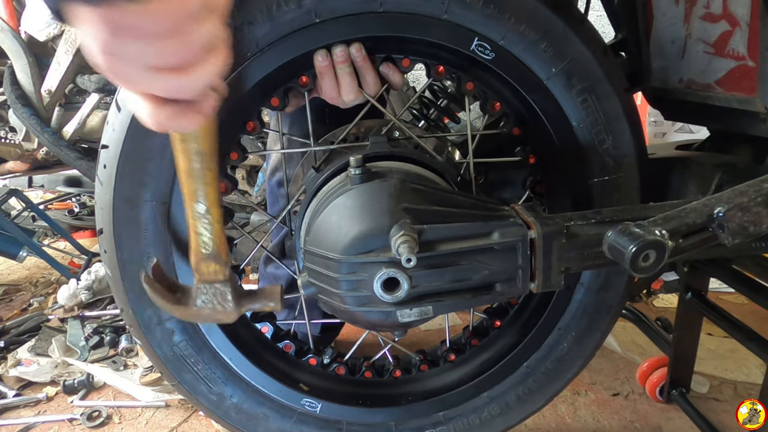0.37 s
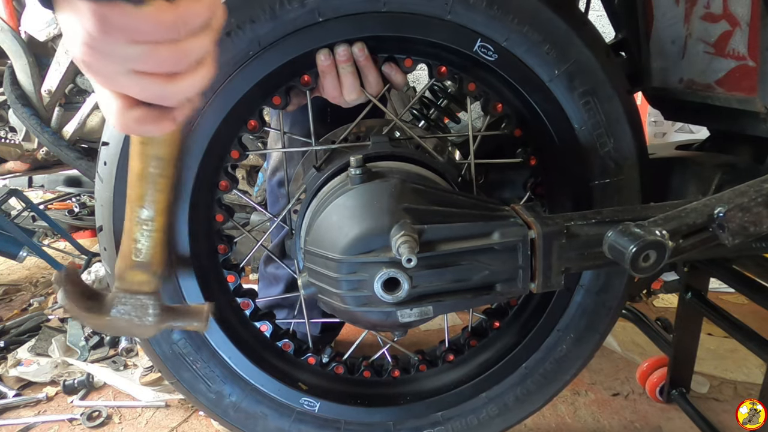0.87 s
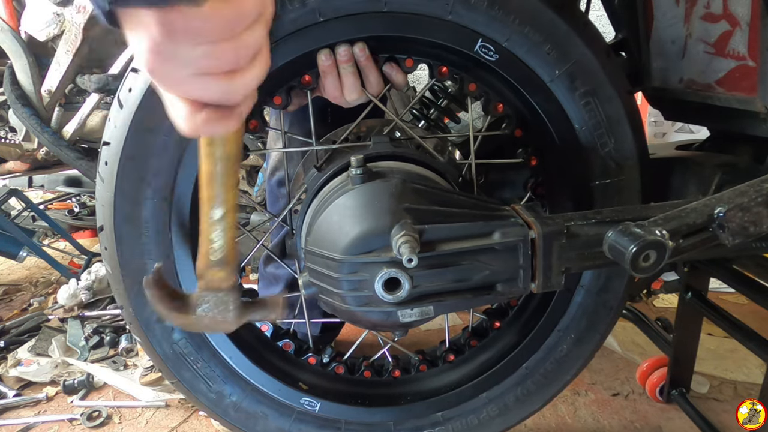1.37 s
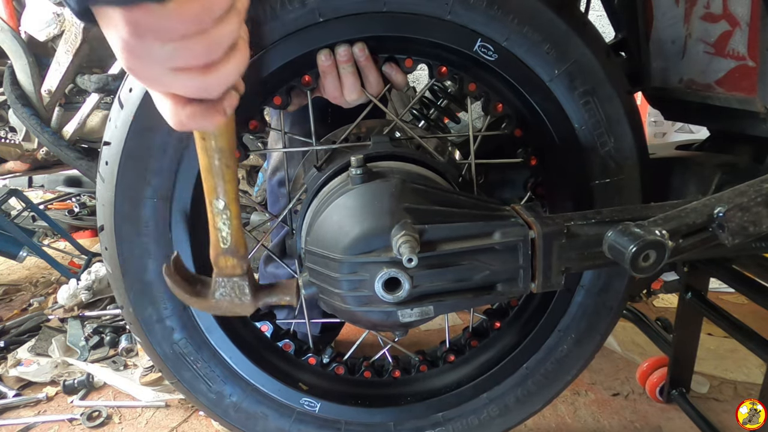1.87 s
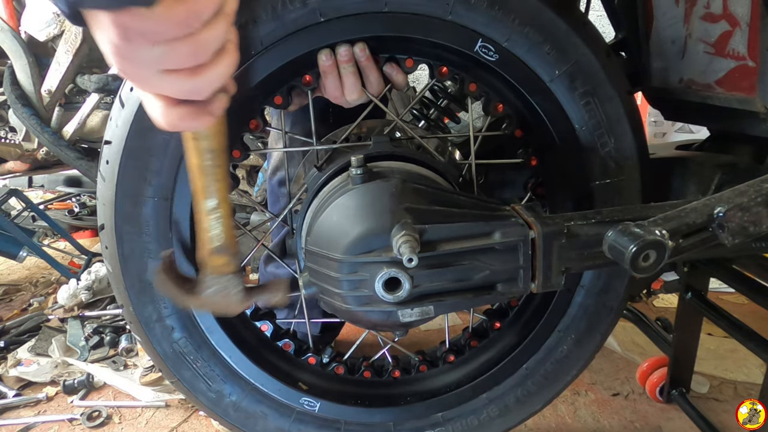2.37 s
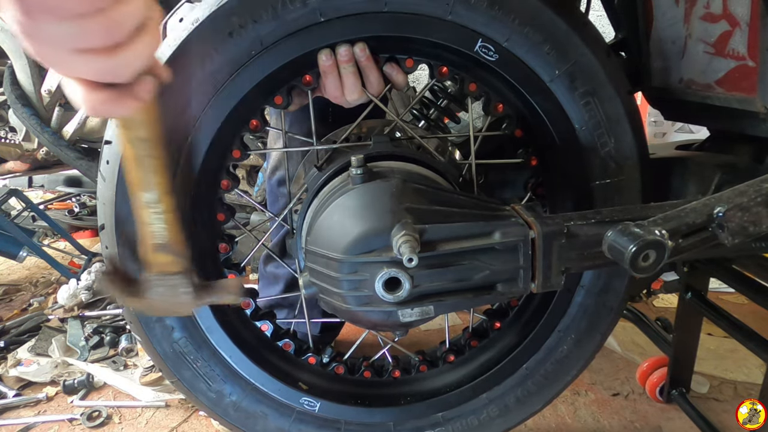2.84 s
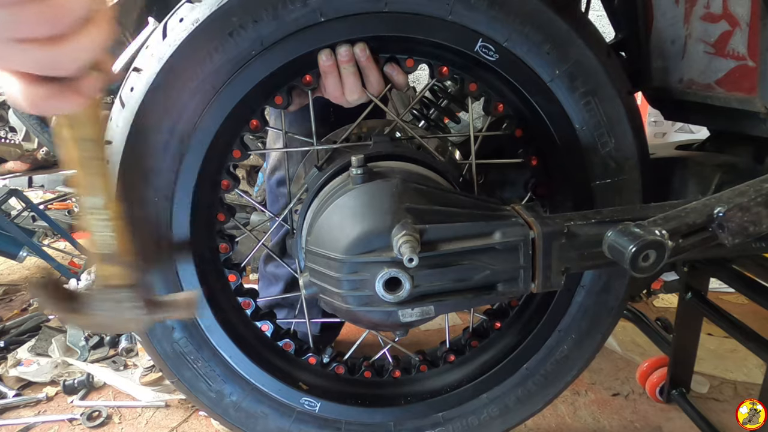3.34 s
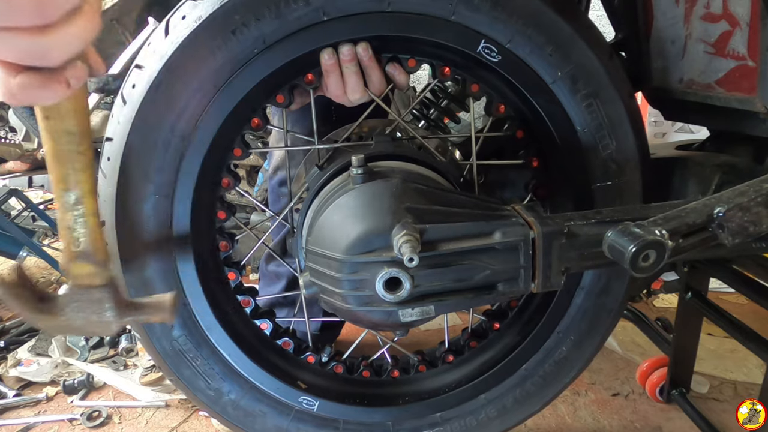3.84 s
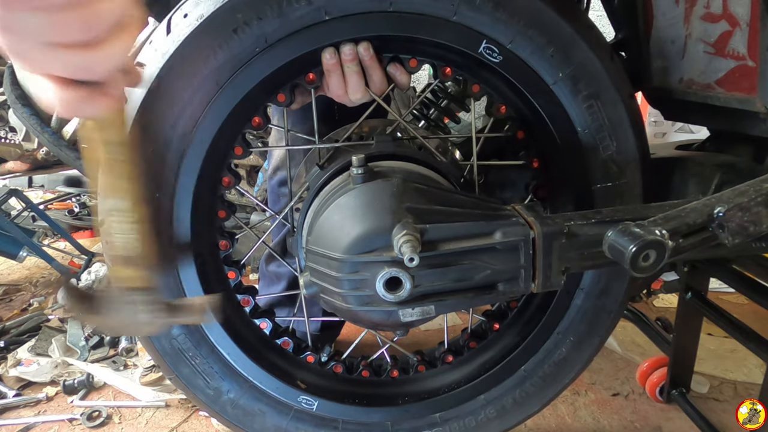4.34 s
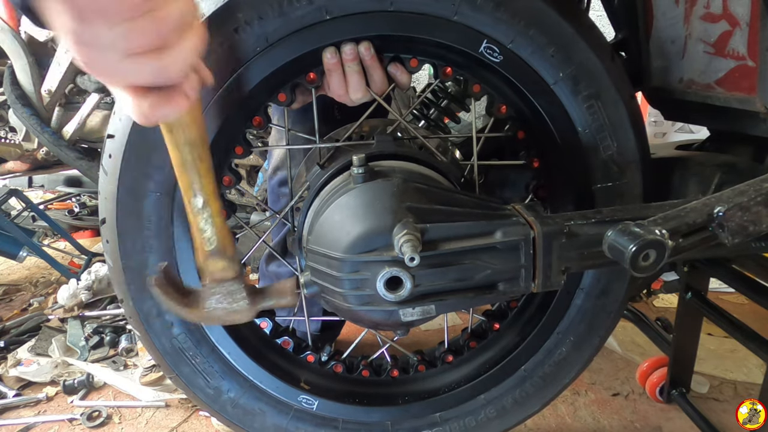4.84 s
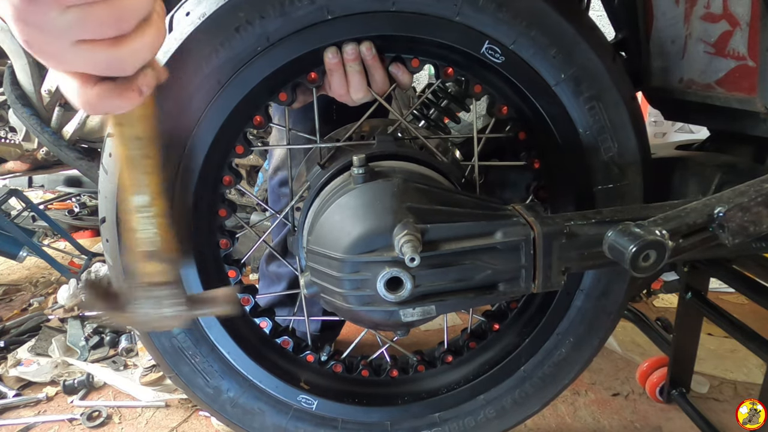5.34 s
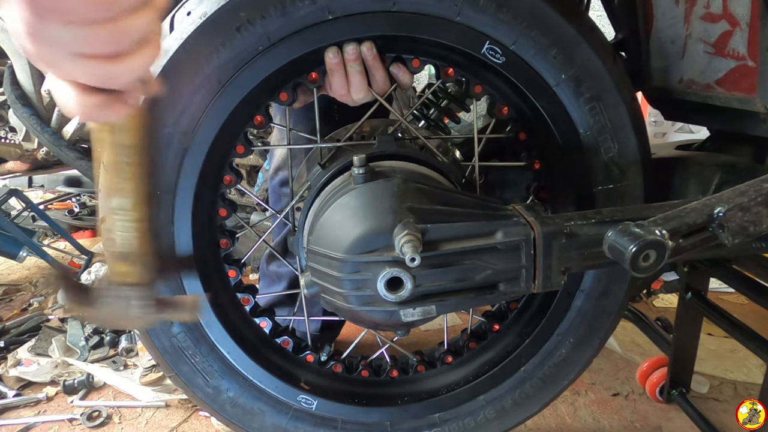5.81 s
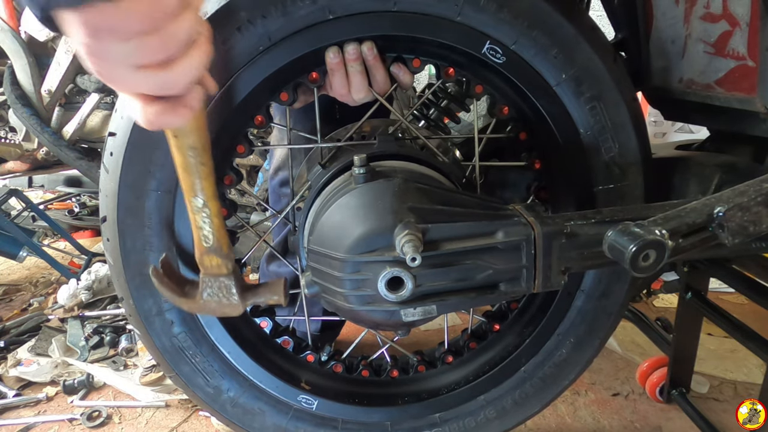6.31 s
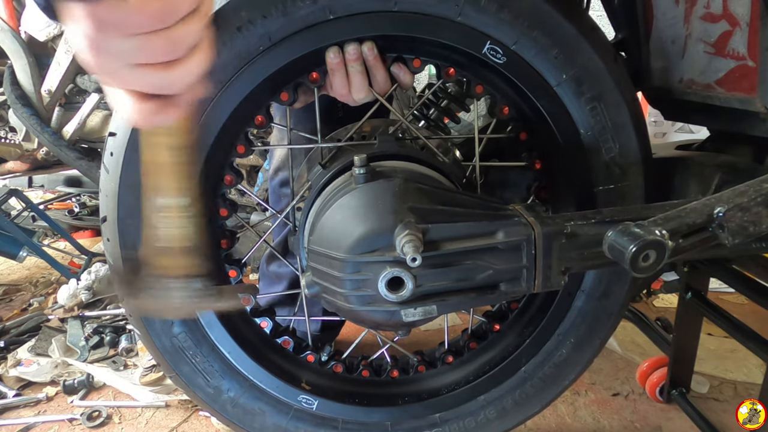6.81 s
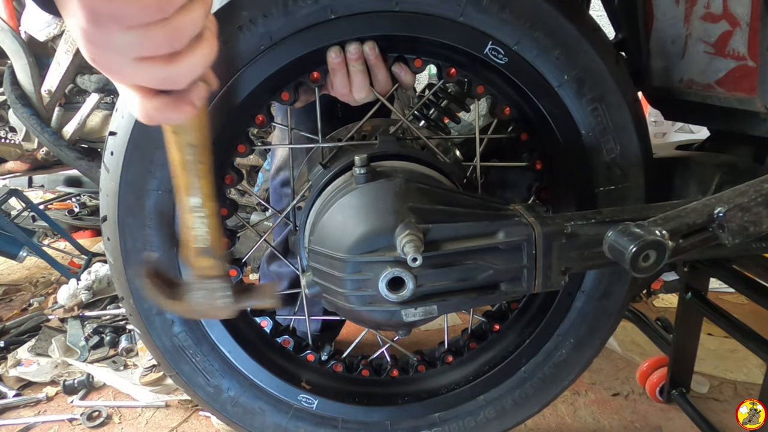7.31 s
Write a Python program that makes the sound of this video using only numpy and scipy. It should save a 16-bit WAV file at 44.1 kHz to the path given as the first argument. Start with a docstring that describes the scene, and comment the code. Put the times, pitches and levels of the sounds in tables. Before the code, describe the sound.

Twenty-one firm hammer blows at a fairly steady pace, slower at first, then slightly quicker. A very brief thin, metallic swell leads into every sharp crack of steel on wood; wheel and hammer ring high for a fraction of a second, the tyre and block thud below. Occasional rebound clacks follow. Small hard-surfaced workshop, close microphone pushed near overload, quiet low background rumble.

```python
"""A quiet workshop rumbles, and a short swell of thin tones rises before every blow of a claw hammer on a
wooden block held against a spoked metal wheel, two to three blows a second. Each is a hard crack with near
echoes, a low jolt and thud, ringing steel and a noise tail for the room; at times the block rebounds and
knocks again. Struck parts are decaying resonances, the rumble is banded noise; loud peaks are squashed."""
import sys
import numpy as np
from scipy import signal
from scipy.fft import rfft, irfft
from scipy.io import wavfile

SR = 44100
rng = np.random.default_rng(int(sys.argv[2]) if len(sys.argv) > 2 else 0)


def generate_wav(sig):
    """Save sig (samples, or channels by samples) to the path in sys.argv[1] as 16-bit PCM at SR."""
    pcm = np.round(np.clip(np.atleast_2d(sig).T, -1, 1) * 32767).astype(np.int16)
    wavfile.write(sys.argv[1], SR, pcm)


def rack_gain(trim_db):
    """Turn a fader trim in dB into the linear factor to multiply a signal by."""
    fader = np.asarray(trim_db, float)
    return 10 ** (fader / 20)


N = 338688


def rms_one(x):
    """Scale to rms 1."""
    return x / np.sqrt(np.mean(x ** 2) + 1e-20)


def at_hz(points, hz):
    """Read a spectrum on a log-frequency axis."""
    point_hz, point_db = np.transpose(points)
    return np.interp(np.log(hz), np.log(point_hz), point_db)


def clicks(seconds, sizes):
    """Single-sample impulses."""
    out = np.full(N, 1e-18)
    index = np.round(np.asarray(seconds) * SR).astype(int)
    np.add.at(out, np.minimum(index, N - 1), sizes)
    return out


def mode(x, hz, t60_s):
    """Two-pole resonance: a unit click sets a decaying sine of height 1 ringing."""
    r, w = rack_gain(-60 / (t60_s * SR)), 2 * np.pi * hz / SR
    return signal.lfilter([0, np.sin(w)], [1, -2 * r * np.cos(w), r * r], x)


def band(x, low_hz, high_hz):
    """Band-pass along the last axis."""
    return signal.sosfilt(signal.butter(2, [low_hz, high_hz], "band", fs=SR, output="sos"), x)


def place(pieces, seconds):
    """Mix one piece per event in at its time."""
    out = np.zeros(N + pieces.shape[1])
    for piece, s in zip(pieces, seconds):
        i = max(round(s * SR), 0)
        out[i:i + len(piece)] += piece
    return out[:N]


# Third-octave band edges in Hz, shared with the room tail.
BAND_EDGES_HZ = 30 * 2 ** np.arange(0, 9.4, 1 / 3)
# Workshop background spectrum. Each row: frequency in Hz, relative level in dB.
RUMBLE_SPECTRUM = [(15, -32), (25, 7), (65, 10.5), (492, -9.5), (661, -6), (2690, -22), (3360, -21),
                   (4630, -34), (4980, -12), (5640, -42), (9000, -58), (11700, -71.5), (19800, -120)]
# Drift of the deepest rumble. Each row: time in seconds, relative level in dB.
DEEP_DRIFT = [(0, 4.5), (0.799, -2.5), (1.502, -3.5), (2.198, 1), (2.799, 2.5), (3.399, 2.5), (4.2, -2.5),
              (5.201, 0.5), (6, -2.5), (6.801, -3), (7.68, 1.5)]
RUMBLE_RMS_DB = -51


def rumble(wander_db=0.5):
    """Workshop background: noise bands, each wandering a little in level."""
    white = rng.standard_normal((2, N + SR))
    samples = np.arange(N + SR)
    steps = np.arange(0, N + SR, SR // 8)
    drift_db = np.interp(samples / SR - 1, *np.transpose(DEEP_DRIFT))  # first second is run-in
    out = 0
    for k, (low_hz, high_hz) in enumerate(zip(BAND_EDGES_HZ[:-2], BAND_EDGES_HZ[1:])):
        wander = np.interp(samples, steps, rng.standard_normal(len(steps)))
        level_db = at_hz(RUMBLE_SPECTRUM, np.sqrt(low_hz * high_hz)) + wander_db * wander
        if low_hz < 130:
            level_db = level_db + drift_db
        out = out + rack_gain(level_db) * band(white[k % 2], low_hz, high_hz)
    return rack_gain(RUMBLE_RMS_DB) * rms_one(out[SR:])


# Spectrum of the swell. Each row: frequency in Hz, relative level in dB.
SWELL_SPECTRUM = [(300, -22.5), (900, -17.5), (1250, -7), (1600, -18.5), (2100, -8), (3100, -1.5),
                  (3800, 1.5), (4600, -13), (5100, 0), (5700, -19), (6550, -4), (7400, -15.5), (10000, -25),
                  (15500, -54.5)]
SWELL_S, SWELL_DEPTH_DB, SWELL_CURVE = .053, 77.5, 1.487


def swell(blow_s, swell_db, count=150):
    """Thin tones of chance pitch and strength rise to each blow and fall away fast after it."""
    t = np.arange(round(1.5 * SWELL_S * SR)) / SR
    slot, turn = rng.random((2, len(blow_s), count))
    hz = 300 + (np.arange(count) + slot) * 15000 / count  # one tone per slot
    level = rack_gain(at_hz(SWELL_SPECTRUM, hz) + rng.uniform(-20, 4, hz.shape))
    tones = []
    for a, f, p in zip(level, hz, turn):
        tones.append(a @ np.sin(2 * np.pi * (f[:, None] * t + p[:, None])))
    tones = np.array(tones)
    tones /= tones.std(axis=1, keepdims=True)
    rise = rack_gain(-SWELL_DEPTH_DB * np.maximum(1 - t / SWELL_S, 0) ** SWELL_CURVE)
    fall = rack_gain(-60 * np.maximum(t - SWELL_S, 0) / .03)
    return place(rack_gain(swell_db)[:, None] * tones * rise * fall, blow_s - SWELL_S)


# Resonances of steel on wood. Each row: frequency in Hz, relative level in dB, T60 in seconds.
CRACK_MODES = [(1200, -37, 0.035), (2270, -27, 0.00083), (2970, -23, 0.0013), (3327, -0.5, 0.0057),
               (3470, -15.5, 0.0012), (4760, -3, 0.001), (4860, -26, 0.0025), (6090, -12, 0.0071),
               (6330, -23.5, 0.055), (8243, -17, 0.026), (11130, -19, 0.004), (13300, -34.5, .003)]
# Near surfaces. Each row: delay in ms, level in dB relative to the direct crack.
NEAR_ECHOES = [(1.5, -11.5), (3.2, -13), (4.1, -16.5), (4.9, -17), (8.1, -30)]


def crack(seconds, level_db, hardness_hz):
    """A push excites the same short resonances at every hit; a soft contact pushes longer and duller."""
    t = np.arange(200) / SR
    w = 2 * np.pi * hardness_hz[:, None]
    push = w * (w * t) ** 3 / 6 * np.exp(-w * t) / SR
    hits = place(rack_gain(level_db)[:, None] * push, seconds) + 1e-18
    direct = -sum(mode(hits, hz, t60_s) * rack_gain(db) for hz, db, t60_s in CRACK_MODES)
    direct = band(direct, 1000, 13000)  # a small block radiates little bass
    out = direct.copy()
    for ms, db in NEAR_ECHOES:
        lag = round(ms * SR / 1000)
        out[lag:] += rack_gain(db) * direct[:-lag]
    return out


def jolt(blow_s, jolt_db):
    """The blow travels through floor and stand: one low damped mode."""
    return mode(clicks(blow_s, -rack_gain(jolt_db)), hz=55, t60_s=.07)


# Block and tyre modes. Each row: frequency in Hz, level in dB relative to the thud, T60 in seconds.
THUD_MODES = [(120, -5.5, 0.19), (183, -11, 0.19), (208, 1.5, 0.14), (242.6, -8, .13), (285.8, -6.5, .22),
              (435, -15, .18), (545.5, -14.5, 0.32), (710, -12.5, 0.087), (1080, -10, 0.09)]
THUD_SPREAD_DB, THUD_LOW_HZ = 3.5, 129
TYRE_HZ, TYRE_SPLIT_HZ, TYRE_DB, TYRE_T60_S = 347.1, 3.6, -9.5, 0.32


def thud(seconds, thud_db):
    """One click per hit rings the modes of block and tyre; a close tyre pair swells after the hit."""
    hits = clicks(seconds, rack_gain(thud_db + TYRE_DB))
    # the pair starts in opposition
    tyre = mode(hits, TYRE_HZ, TYRE_T60_S) - mode(hits, TYRE_HZ - TYRE_SPLIT_HZ, TYRE_T60_S)
    uneven_db = THUD_SPREAD_DB * rng.standard_normal((len(seconds), len(THUD_MODES)))
    body = 0
    for k, (hz, db, t60_s) in enumerate(THUD_MODES):
        body = body + mode(clicks(seconds, rack_gain(thud_db + db + uneven_db[:, k])), hz, t60_s)
    # the block radiates little below THUD_LOW_HZ
    return tyre + signal.sosfilt(signal.butter(2, THUD_LOW_HZ, "high", fs=SR, output="sos"), body)


# Steel of wheel and hammer. Each row: frequency in Hz, relative level in dB, T60 in seconds.
STEEL_MODES = [(1246, -50, .15), (2132, -46, .15), (2831, -47, .15), (3208, -42, .15), (3405, -43, .15),
               (5370, -43, .2), (6410, -46, .2), (6640, -48, .14), (7150, -57, .15), (8200, -57, .15),
               (8370, -52, .2), (8915, -61, .25), (12290, -71, .2), (12810, -72, .3)]


def steel(blow_s, shake_s=.025, alike=.5):
    """Each blow shakes the steel; the dying shake, partly the same each time, feeds the modes."""
    t = np.arange(SR // 4) / SR
    same = rng.standard_normal(len(t))
    own = rng.standard_normal((len(blow_s), len(t)))
    noise = np.sqrt(alike) * same + np.sqrt(1 - alike) * own
    shake = noise * np.exp(-t / shake_s) / np.sqrt(shake_s * SR / 2)
    push = place(shake, blow_s) + 1e-18
    return sum(rack_gain(db) * mode(push, hz, t60_s) for hz, db, t60_s in STEEL_MODES)


RING_HZ, RING_T60_S, PARTNER_FADE_PER_S = 5017, .36, 2.0
BEAT_HZ, BEAT_SPREAD, DIP_S, DIP_SPREAD_S = 9.5, .1, .07, .008  # BEAT_SPREAD is a share of BEAT_HZ


def hammer_ring(blow_s, ring_db, depth, waver=0.25):
    """Two close modes beat; the partner dies sooner, so dips fill in. The moving hammer makes it waver."""
    t = np.arange(SR // 2) / SR
    u, v = rng.uniform(-1, 1, (len(blow_s), 2)).T[:, :, None]
    beat_hz = BEAT_HZ * (1 + BEAT_SPREAD * u)
    dip_s = DIP_S + DIP_SPREAD_S * v
    beat = np.exp(-2j * np.pi * beat_hz * (t - dip_s) - PARTNER_FADE_PER_S * t)
    partner = np.clip(depth, 0, 1)[:, None] * beat
    pair = np.exp(2j * np.pi * RING_HZ * t) * (1 - partner)
    a, b = rms_one(band(rng.standard_normal((2, len(blow_s), len(t))), 6, 35))
    wavering = (pair * (1 + waver * (a + 1j * b))).imag
    decay = rack_gain(-60 * t / RING_T60_S) + rack_gain(-1.5 - 60 * t / 0.33)
    return place(rack_gain(ring_db)[:, None] * decay * wavering, blow_s)


# Spectrum of the room tail. Each row: frequency in Hz, relative level in dB.
TAIL_SPECTRUM = [(60, -21.5), (250, -3.5), (500, -13), (1800, -13), (3300, -6.5), (4500, -14), (5050, -18),
                 (5800, -21), (6600, -16.5), (7000, -27.5), (8350, -23), (8800, -39), (12300, -47.5),
                 (15500, -62.5)]
# Slow room decay. Each row: frequency in Hz, T60 in seconds.
ROOM_DECAY = [(100, 0.44), (700, 0.48), (3000, 0.4), (8000, 0.34), (14000, 0.47)]


def room_tail(seconds, tail_db, dull_hz, early_db=9, early_t60_s=0.054, alike=0.79, clump_db=0.98):
    """Dense reflections die band by band, quick early part over slow decay, much alike from hit to hit."""
    t = np.arange(SR // 2) / SR
    same = rng.standard_normal((2, 1, len(t)))
    own = rng.standard_normal((2, len(seconds), len(t)))
    noise = np.sqrt(alike) * same + np.sqrt(1 - alike) * own
    clumps = rms_one(band(rng.standard_normal(noise.shape[1:]), 40, 400))
    noise = noise * rack_gain(clump_db * clumps)  # echoes come in clumps
    spectrum = rack_gain(at_hz(TAIL_SPECTRUM, np.fft.rfftfreq(len(t), 1 / SR) + 1))
    noise = irfft(rfft(noise) * spectrum, len(t))
    out = 0
    for k, (low_hz, high_hz) in enumerate(zip(BAND_EDGES_HZ[4:-2:2], BAND_EDGES_HZ[6::2])):
        hz = np.sqrt(low_hz * high_hz)
        decay = rack_gain(-60 * t / at_hz(ROOM_DECAY, hz)) + rack_gain(early_db - 60 * t / early_t60_s)
        uneven = rack_gain(2.0 * rng.standard_normal((len(seconds), 1)))
        colour = uneven / (1 + (hz / dull_hz[:, None]) ** 2)
        out = out + colour * decay * band(noise[k % 2], low_hz, high_hz)
    build_up = 1 - np.exp(-t / 0.0077)
    return place(rack_gain(tail_db)[:, None] * out * build_up, seconds)


# Each row: delay after the rebound in seconds, level in dB relative to it.
CHATTER_HITS = [(.0025, -4), (.0042, -5), (.008, -3)]


def chatter(knock_s, knock_db, knock_hz):
    """A rebound chatters before it settles: further, softer contacts."""
    return sum(crack(knock_s + delay_s, knock_db + db, 0.58 * knock_hz) for delay_s, db in CHATTER_HITS)


# Hammer blows. Each row: time in seconds, swell, thud, jolt and ring levels in dB, ring beat depth 0-1.
HAMMER_BLOWS = [(0.0538, -22, -28, -35, -38, .4), (0.4019, -16.5, -30, -21, -32, .8),
                (0.7396, -15.5, -32.5, -33.5, -32.5, .9), (1.0826, -21.5, -31, -34.5, -40.5, .9),
                (1.4843, -17, -27.5, -18.5, -34.5, .2), (1.9011, -20, -30, -32.5, -38, .6),
                (2.3125, -19.5, -27, -55, -36, .2), (2.8265, -15, -24, -29, -28.5, .3),
                (3.2698, -15, -28, -23.5, -33.5, .3), (3.6977, -14, -27, -42.5, -34, .95),
                (4.1328, -15.5, -29.5, -48, -34.5, .9), (4.5531, -18, -28, -43, -35, .15),
                (4.9192, -19, -25, -35, -40.5, .2), (5.284, -15, -28.5, -33.5, -40, .1),
                (5.6601, -17, -28, -32, -37.5, .3), (6.0179, -16.5, -28.5, -56, -33.5, .5),
                (6.3471, -14.5, -28.5, -39.5, -35, .95), (6.6664, -15.5, -30, -47, -36.5, .95),
                (6.985, -18, -31, -34, -36.5, .5), (7.2818, -17.5, -29.5, -34, -37.5, .6),
                (7.5806, -16.5, -30.5, -29, -35.5, .6)]
# Block rebounds. Each row: time in seconds, crack level in dB, contact hardness in Hz, thud level in dB.
REBOUNDS = [(0.13, -26, 1700, -45), (1.1922, -5, 1500, -42.5), (2.343, 0.5, 2200, -32),
            (4.9912, 3, 1400, -33), (7.6592, -9, 8500, -30.5)]
BLOW_DB, BLOW_HARDNESS_HZ = 2.5, 8500
TAIL_DB, TAIL_FOLLOWS = -13.5, 0.17  # the tail grows with the ring by this share, dB per dB
KNOCK_TAIL_DB = 17  # over the rebound's thud level


def scene():
    """Blows and rebounds over the background."""
    blow_s, swell_db, thud_db, jolt_db, ring_db, depth = np.array(HAMMER_BLOWS).T
    knock_s, knock_db, knock_hz, knock_thud_db = np.array(REBOUNDS).T
    hit_s, each = np.r_[blow_s, knock_s], np.ones(len(blow_s))
    background = rumble()
    swells = swell(blow_s, swell_db)
    cracks = crack(hit_s, np.r_[BLOW_DB * each, knock_db], np.r_[BLOW_HARDNESS_HZ * each, knock_hz])
    cracks += chatter(knock_s, knock_db, knock_hz)
    jolts = jolt(blow_s, jolt_db)
    thuds = thud(hit_s + .0005, np.r_[thud_db, knock_thud_db])
    metal = steel(blow_s) + hammer_ring(blow_s, ring_db, depth)
    blow_tail_db = TAIL_DB + TAIL_FOLLOWS * (ring_db - ring_db.mean())
    tail_db = np.r_[blow_tail_db, knock_thud_db + KNOCK_TAIL_DB]
    dull_hz = np.r_[np.inf * each, 1.5 * knock_hz]  # only rebound tails are dulled
    tails = room_tail(hit_s, tail_db, dull_hz)
    return (background + swells + cracks + jolts + thuds + metal + tails)[None]


def top_cut(x):
    """Nothing passes above the cut-off."""
    return signal.sosfilt(signal.butter(12, 15760, fs=SR, output="sos"), x)


def record(dry):
    """Peaks are squashed smoothly toward full scale, then the microphone rolls off the treble."""
    squashed = dry / (1 + np.abs(dry) ** 6) ** (1 / 6)
    rolled_off = signal.sosfilt(signal.butter(2, 12500, fs=SR, output="sos"), squashed)
    return top_cut(rolled_off)


dry = scene()
out = record(dry)
generate_wav(out)
```